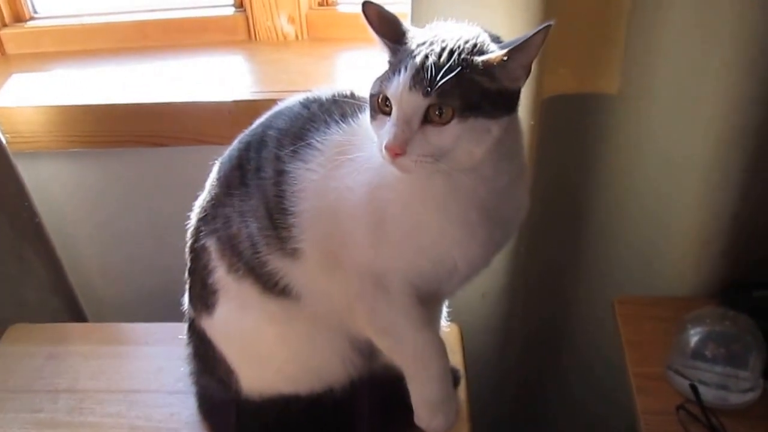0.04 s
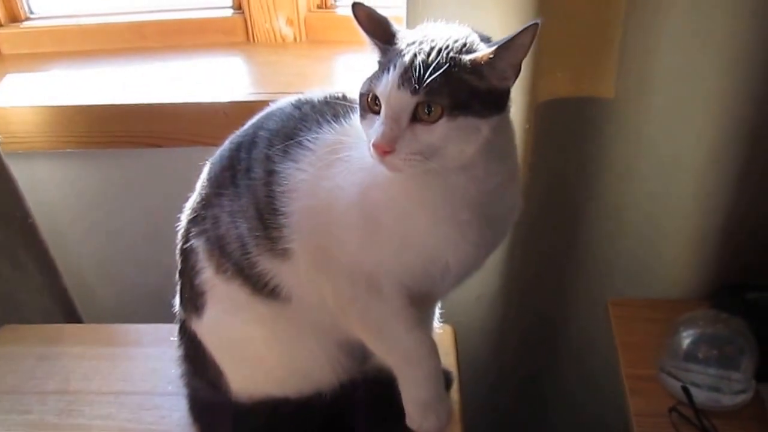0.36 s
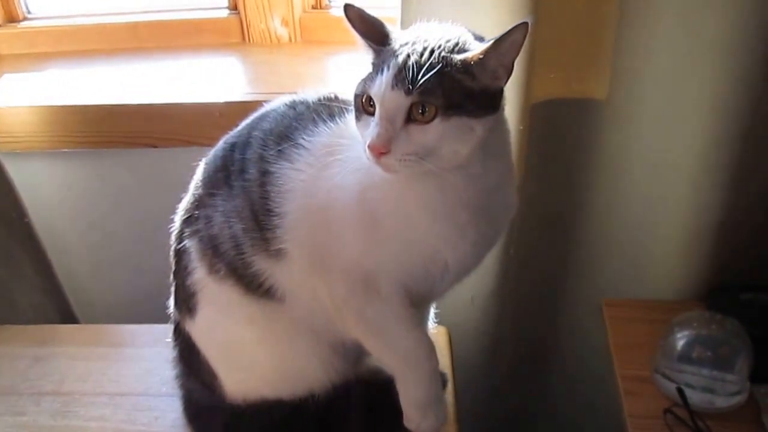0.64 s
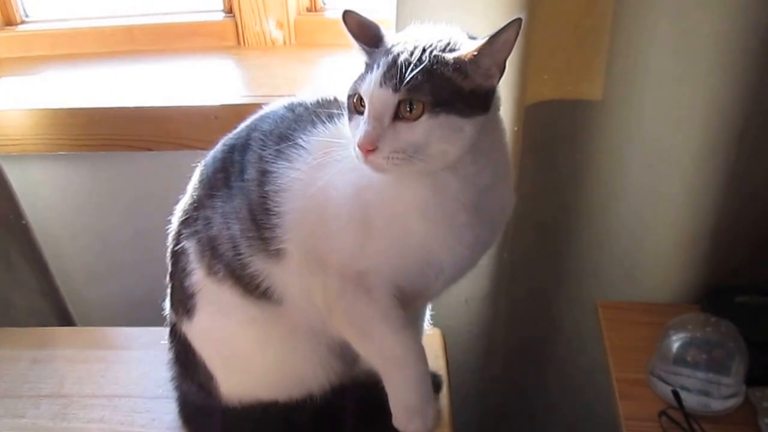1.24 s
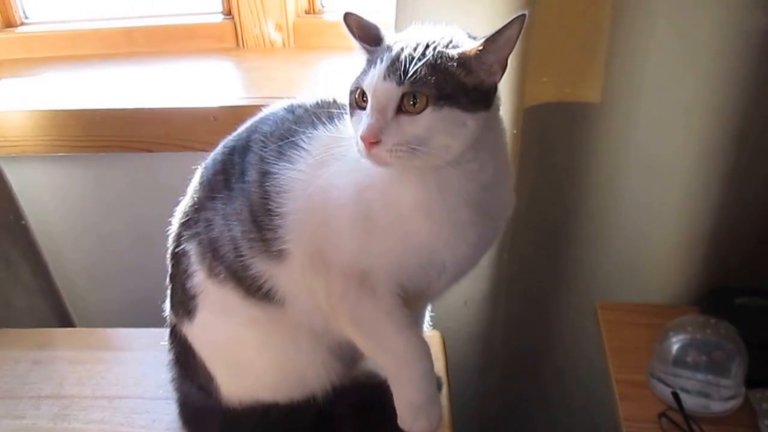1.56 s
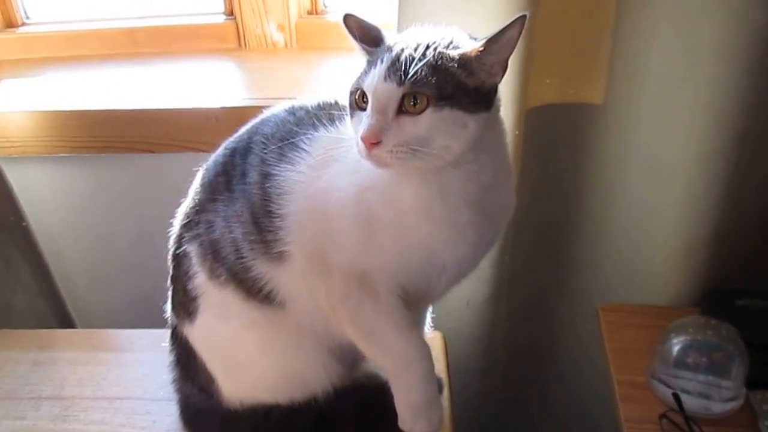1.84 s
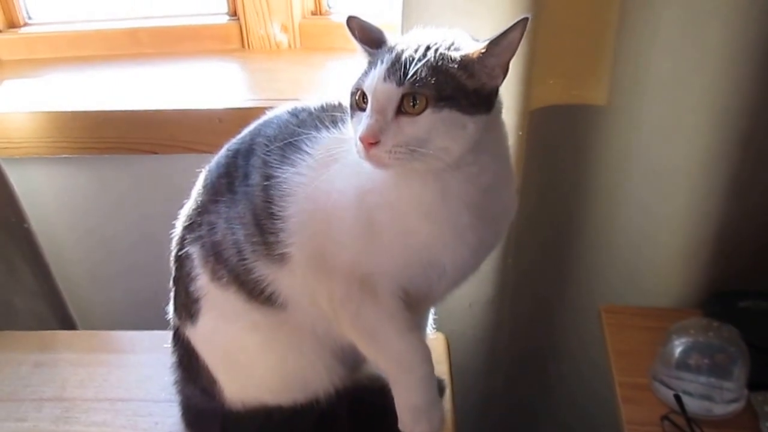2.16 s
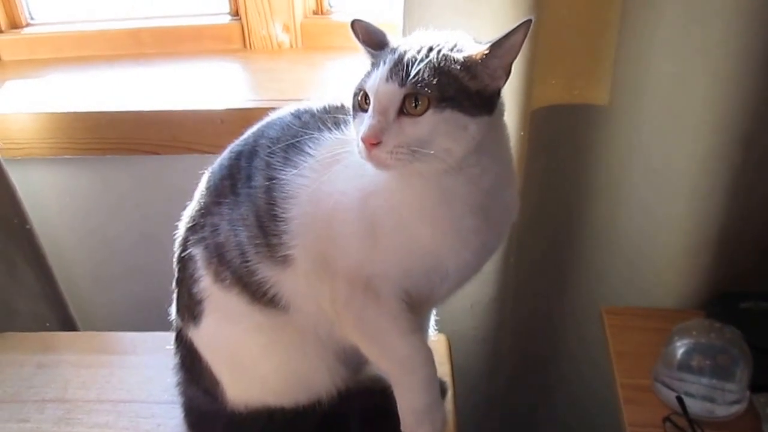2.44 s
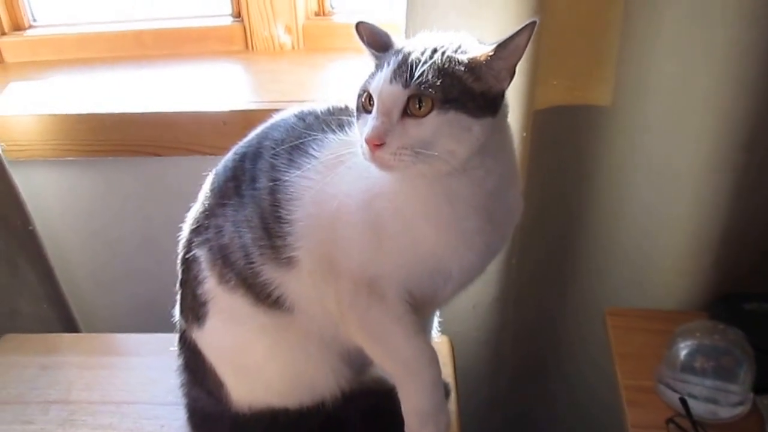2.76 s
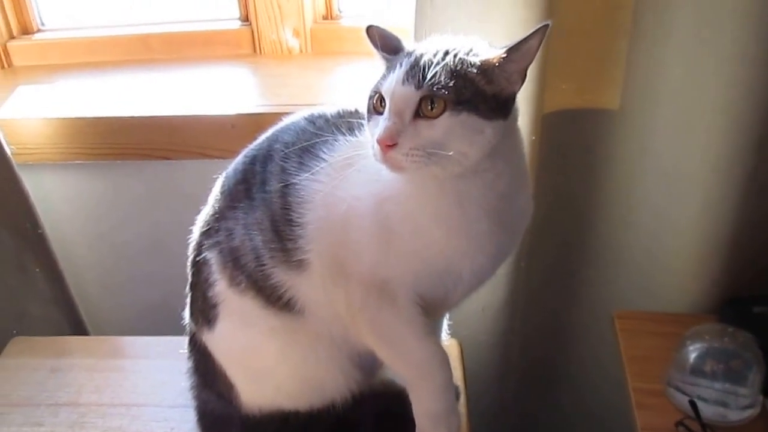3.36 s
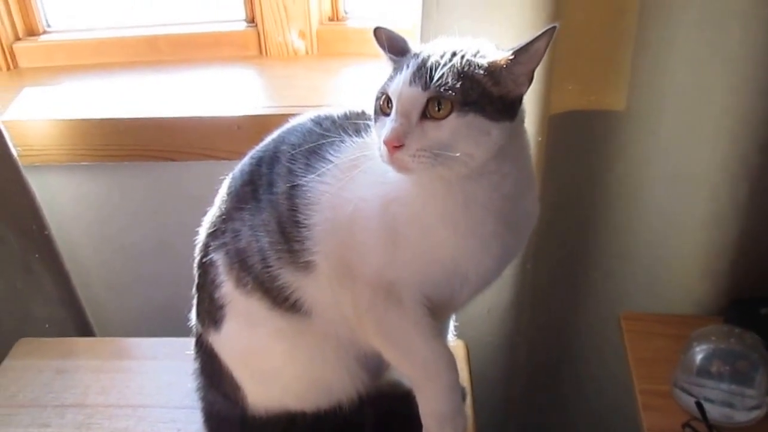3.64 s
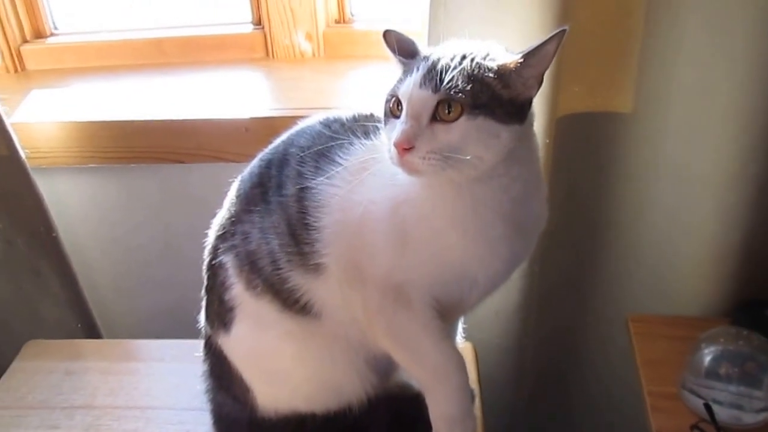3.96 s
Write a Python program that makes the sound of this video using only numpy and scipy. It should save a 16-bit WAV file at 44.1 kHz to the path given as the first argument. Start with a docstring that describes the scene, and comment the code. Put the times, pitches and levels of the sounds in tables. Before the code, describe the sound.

A cat draws breath and lets out one long, low growl in a quiet room.

```python
"""A quiet room, by a window: a cat draws air and lets out one long growl with its mouth nearly shut.
The voice, a harmonic series, starts low and rattling, slides up to a moan and sags; the throat catches
some sixty times a second, modulating pitch and level. Turbulent breath adds rasp and faint wheezes,
and the mouth clicks once. A small piece of metal jingles faintly in its free modes of vibration.
Under it all lie room hiss and a thin electrical whine."""
import sys
import numpy as np
from scipy import signal
from scipy.fft import rfft, irfft
from scipy.io import wavfile
from scipy.ndimage import uniform_filter1d

SR = 44100
rng = np.random.default_rng(int(sys.argv[2]) if len(sys.argv) > 2 else 0)


def master(y):
    """Save y as 16-bit WAV."""
    cut = np.clip(np.atleast_2d(y).T, -1, 1)
    pcm = np.round(cut * 32767)  # scale
    wavfile.write(sys.argv[1], SR, pcm.astype(np.int16))


N = 176400
T = np.arange(N) / SR
BIN_HZ = np.arange(N // 2 + 1) * SR / N

# Fundamental of the voice: time_s, pitch_hz
PITCH = [(.8,168.5),(.9,161.8),(1.0,181.5),(1.06,185.2),(1.12,180.4),(1.37,179),(1.41,195.9),(1.46,194.7),(1.57,212.5),(1.615,232.8),(1.66,283),(1.75,313),(1.87,320.1),(2.13,316.6),(2.36,327.4),(2.48,316.2),(3.01,322.6),(3.24,307.6),(3.5,292),(3.7,297),(3.765,294),(3.795,279.7),(3.93,286),(4,277)]
# Three lowest harmonics: time_s, first_db, second_db, third_db
HARMONICS = [(.78,-66,-63,-63),(.83,-46,-43.5,-59),(.9,-44.5,-38,-50),(.98,-39.5,-35.5,-43),(1.12,-41,-36,-45.5),(1.27,-38,-35.5,-45),(1.37,-44,-39,-49.5),(1.41,-35.5,-35.5,-54.5),(1.49,-37.5,-34,-44),(1.54,-32.5,-45.5,-45.5),(1.69,-39,-37,-48),(1.75,-32,-41,-56),(2.03,-33,-34.5,-52.5),(2.35,-30,-33,-51.5),(2.5,-32,-34.5,-49.5),(2.68,-30.5,-33,-49),(3.08,-31,-34,-51.5),(3.37,-32.5,-34.5,-43),(3.51,-37.5,-34,-41.5),(3.75,-34.5,-33,-42.5),(3.8,-41.5,-33,-42.5),(4,-44,-32.5,-43.5)]
# Higher harmonics, relative to the third: frequency_hz, gain_db
OVERTONES = [(780,-10),(950,-18),(1100,-25),(1280,-19.5),(1500,-31),(2500,-36)]
# Weight of the rasp and of the unsteadiness above the fundamental: time_s, share
ROUGHNESS = [(3.1,.85),(3.5,.35)]
# Spectrum of the throat's rasp: frequency_hz, gain_db
RASP_SPECTRUM = [(170,-30),(280,-4),(380,-1),(600,-4.5),(860,2),(1030,-21),(2000,-35)]
def growl():
    """Amplitude and frequency modulation: eight harmonics dip at each catch; rasp pulses every cycle."""
    catch = throat_catches()
    catch -= uniform_filter1d(catch, size=SR // 10)   # zero mean keeps the average pitch
    jitter, sag_hz, waver_hz = .0089, 22, 1.5
    pitch = in_time(PITCH)[0] * (1 + jitter * drift(112)) - sag_hz * catch + waver_hz * drift(16)
    phase = 2 * np.pi * np.cumsum(pitch) / SR
    first, second, third = in_time(HARMONICS)
    roughness, = in_time(ROUGHNESS)
    shimmer_db, upper_shimmer_db = .99 * drift(17), 2
    levels = [first + shimmer_db, second + shimmer_db, third + upper_shimmer_db * roughness * drift(22)]
    levels += [third + at_hz(OVERTONES, k * pitch) + upper_shimmer_db * drift(60) for k in range(4, 9)]
    dip = signal.hilbert(catch)   # each catch weakens a harmonic and shifts its phase
    voice = np.zeros(N)
    for k, db in enumerate(levels, 1):
        modulation = 1 - dip * (roughness if k > 1 else 1)
        voice -= np.sqrt(2) * from_db(db) * np.real(modulation * np.exp(1j * k * phase))
    effort = from_db(first) + from_db(second)
    puffs = tint((1 + np.cos(phase)) * rng.standard_normal(N), RASP_SPECTRUM)
    rasp = from_db(-48.5) * in_time(RATTLE)[0] * roughness * np.sqrt(effort / effort.mean()) * puffs
    return voice + rasp


# Strength of the throat's rattle: time_s, depth
RATTLE = [(.8,1.1),(1.0,.85),(1.45,.7),(1.63,.85),(1.87,.7),(2.05,.4),(3.1,.25),(3.5,.55),(4,.8)]
# Single deep catches: time_s, depth
DEEP_CATCHES = [(1.81,0.78),(2.232,0.5),(2.388,0.72),(2.583,0.3),(2.717,0.58),(3.202,0.54),(3.272,0.64),(3.785,.5)]
def throat_catches(rate_hz=57, jitter=.11, depth_spread=.45, max_width_s=.0026):
    """Subharmonic pulsation: the throat constricts briefly once every few cycles of the voice."""
    timing, strength = rng.standard_normal((400, 2)).T
    pitch, = in_time(PITCH)
    cycles_per_catch = np.round(pitch / rate_hz)
    count = np.cumsum(pitch / cycles_per_catch) / SR
    beats = np.interp(np.arange(len(timing)), count, T)
    looseness = (np.interp(beats, T, pitch) / pitch.max()) ** 3   # even when low, loose when high
    times = beats + np.cumsum(jitter * looseness * timing) / rate_hz
    width = max_width_s * pitch / pitch.max()
    depths = np.interp(times, *np.transpose(RATTLE))
    depths *= np.exp(depth_spread * looseness * np.minimum(strength, 1))
    out = np.zeros(N)
    for s, depth in [*zip(times[beats < T[-1]], depths), *DEEP_CATCHES]:
        near = slice(*np.searchsorted(T, [s - 10 * max_width_s, s + 10 * max_width_s]))
        pulse = depth * np.exp(-.5 * ((T[near] - s) / width[near]) ** 2)
        out[near] = np.maximum(out[near], pulse)
    return out


# Airflow through the nose: time_s, level_db
NOSE_AIR = [(0,-61),(.8,-61),(.95,-52),(1.25,-68),(1.55,-56),(1.85,-54.5),(2.2,-62),(3.1,-64),(4,-62)]
# Its spectrum: frequency_hz, gain_db
NOSE_SPECTRUM = [(500,-8),(1200,-1),(2600,0),(3200,-4.5),(3750,-2),(4500,-10),(15000,-27)]
def nose_air():
    """Turbulence: air passing through the nose makes broadband noise."""
    return from_db(in_time(NOSE_AIR)[0]) * coloured(NOSE_SPECTRUM)


# Indrawn breath: time_s, level_db
INTAKE = [(0,-57),(.1,-46.5),(.4,-49.5),(.52,-54),(.75,-68.5),(.9,-83)]
# Airway resonances: centre_hz, width_hz, gain_db
AIRWAY = [(459,144,-5),(900,600,-6),(1300,170,-3),(1367,55,-4)]
def intake():
    """Source and filter: resonances shape the noise of air drawn through the narrowed throat."""
    air = sum(from_db(db) * band_noise(hz - width / 2, hz + width / 2) for hz, width, db in AIRWAY)
    return rms_one(air) * from_db(in_time(INTAKE)[0])


# Faint whistles of breath: peak_s, length_s, centre_hz, level_db
WHEEZES = [(.43,.13,1597,-53.5),(.75,0.24,420,-55.5),(1.5,.06,3980,-63),(3.995,.06,1770,-53),(1.66,.08,4020,-62),(3.72,.4,3660,-66)]
def wheezes(width_hz=120):
    """Narrowband noise: air takes on a pitch in whistles that swell and fade."""
    out = np.zeros(N)
    for s, length, hz, db in WHEEZES:
        swell = np.exp(-(2 * (T - s) / length) ** 2)
        out += from_db(db) * swell * band_noise(hz - width_hz / 2, hz + width_hz / 2)
    return out


def mouth_click(start_s=.993, level_db=-41, decay_s=.004):
    """A damped transient: the mouth clicks once as the growl gets going."""
    envelope = (T > start_s) * np.exp(-abs(T - start_s) / decay_s)
    return from_db(level_db) * envelope * band_noise(1800, 3200)


# Touches on the metal: start_s, ring_db, tick_db
TOUCHES = [(.217,-62,-45),(.233,-38,-47),(0.279,-48,-48),(.531,-54.5,-54.5),(.595,-54,-56),(.897,-57,-58),(1.065,-53,-64),(1.13,-53.5,-51),(1.465,-51,-59),(1.922,-52,-54),(1.936,-59,-52)]
# Its modes: frequency_hz, gain_db, t60_s
METAL_MODES = [(5505,-10,0.078),(5580,-2,.11),(7730,-12,0.065),(13250,-18,.04)]
def jingle(tick_decay_s=.0036, wobble_rad=.3):
    """Modal vibration: each impact ticks and sets the loose metal ringing unsteadily."""
    out, tick = np.zeros(N), band_noise(6260, 8470)
    for s, ring_db, tick_db in TOUCHES:
        near = slice(int(s * SR), int(s * SR) + SR // 4)
        age = T[near] - T[near][0]
        out[near] += from_db(tick_db) * tick[near] * np.exp(-age / tick_decay_s)
        for hz, db, t60 in METAL_MODES:
            phase = 2 * np.pi * hz * age + wobble_rad * drift(90)[near]
            out[near] += from_db(ring_db + db - 60 * age / t60) * np.sin(phase)
    return out


def room(x, t60_s=.3, level_db=-21):
    """Reverberation: diffuse reflections follow the direct sound and decay exponentially."""
    age = T[:SR // 2]
    tail = rng.standard_normal(len(age)) * from_db(-60 * age / t60_s) * (age > .004)
    return x + from_db(level_db) * signal.fftconvolve(x, tail / np.linalg.norm(tail))[:N]


# Spectrum of the room's hiss: frequency_hz, gain_db
HISS_SPECTRUM = [(110,0.5),(500,-2.5),(1000,-7),(3000,-14),(5000,-18),(7500,-22.5),(10000,-28),(15500,-31.5)]
# Likeness of left and right: frequency_hz, correlation
COHERENCE = [(2000,1),(5500,0.93),(9000,0.41),(14000,.15)]
def hiss(mid_db=-50.5):
    """Partial coherence: steady noise sounds wider in the treble, where left and right agree less."""
    alike = at_hz(COHERENCE, BIN_HZ)
    side = irfft(rfft(coloured(HISS_SPECTRUM)) * np.sqrt((1 - alike) / (1 + alike)), N)
    mid = coloured(HISS_SPECTRUM)
    return from_db(mid_db) * np.array([mid + side, mid - side])


def whine(centre_hz=7867, beat_hz=30.1, each_tone_db=-74):
    """Beating: a thin electrical whine, equal to two close tones, pulses as they interfere."""
    return 2 * from_db(each_tone_db) * np.sin(2 * np.pi * centre_hz * T) * np.cos(np.pi * beat_hz * T)


def from_db(db):
    """Decibels to amplitude ratio."""
    return 10 ** (np.asarray(db) / 20)


def rms_one(x):
    """Normalisation to rms 1."""
    return x / np.sqrt(np.mean(x ** 2) + 1e-20)


def in_time(rows):
    """Linear interpolation of each column at every sample."""
    s, *columns = np.transpose(rows)
    return [np.interp(T, s, c) for c in columns]


def at_hz(points, hz):
    """Interpolation on a log-frequency axis."""
    frequencies, values = np.transpose(points)
    return np.interp(np.log(hz + 1e-9), np.log(frequencies), values)


def drift(cutoff_hz):
    """Random fluctuation: low-passed noise, rms 1."""
    slow = signal.sosfilt(signal.butter(2, cutoff_hz, fs=SR, output="sos"), rng.standard_normal(N + SR))
    return rms_one(slow[SR:])


def tint(x, spectrum):
    """Spectral shaping, rms 1."""
    return rms_one(irfft(rfft(x) * from_db(at_hz(spectrum, BIN_HZ)), N))


def coloured(spectrum):
    """Spectrally shaped noise, rms 1."""
    return tint(rng.standard_normal(N), spectrum)


def band_noise(low_hz, high_hz):
    """Band-passed noise, rms 1."""
    band = signal.butter(2, [low_hz, high_hz], "band", fs=SR, output="sos")
    return rms_one(signal.sosfilt(band, rng.standard_normal(N)))


def scene():
    """Superposition: cat and metal straight ahead, hiss all round."""
    cat = growl() + nose_air() + intake() + wheezes() + mouth_click()
    return room(cat + jingle()) + hiss() + whine()


def record(dry):
    """Band limiting: a steep low-pass removes the treble above 15.7 kHz."""
    return signal.sosfilt(signal.ellip(12, .1, 90, 15700, fs=SR, output="sos"), dry)


dry = scene()
out = record(dry)
master(out)
```